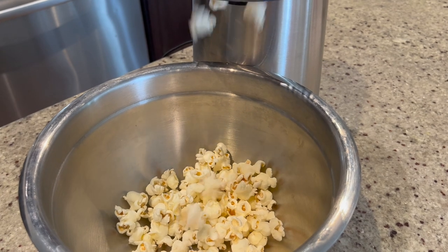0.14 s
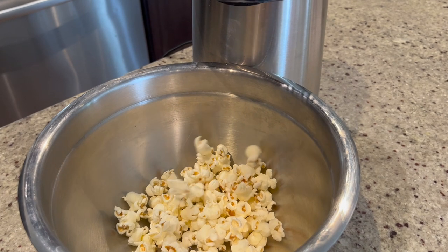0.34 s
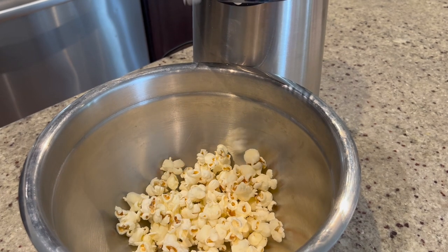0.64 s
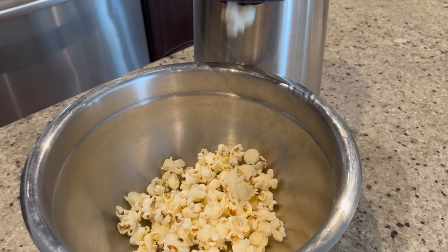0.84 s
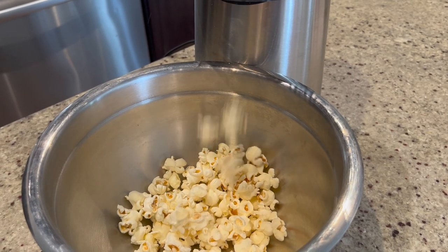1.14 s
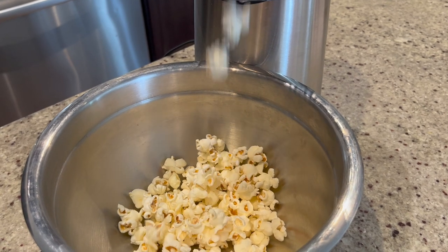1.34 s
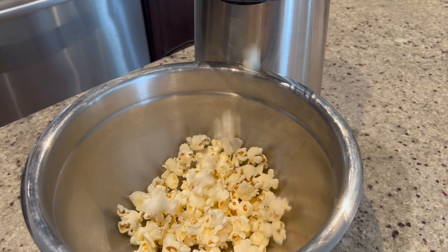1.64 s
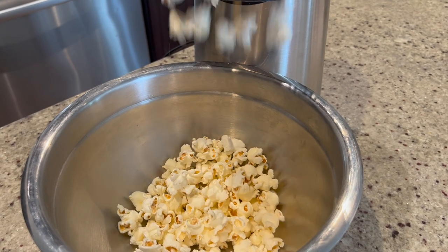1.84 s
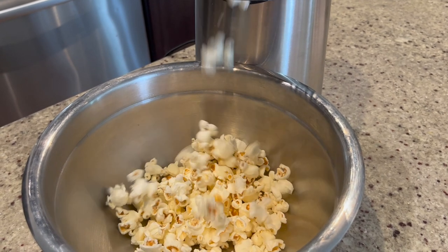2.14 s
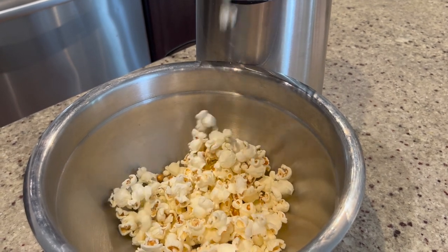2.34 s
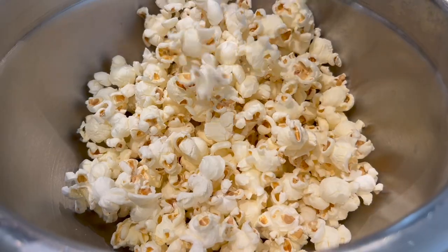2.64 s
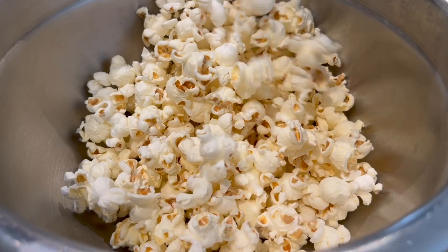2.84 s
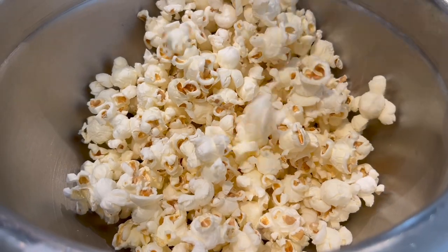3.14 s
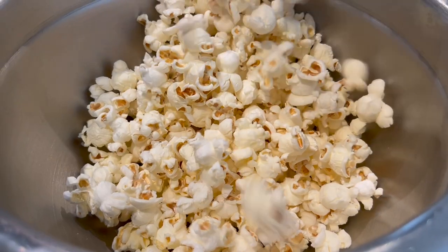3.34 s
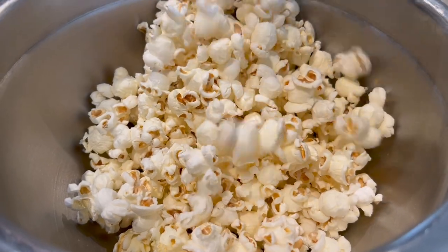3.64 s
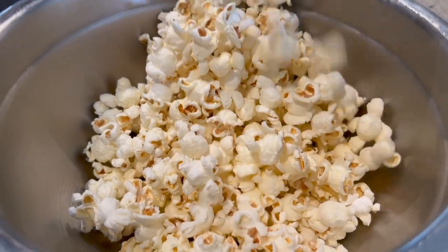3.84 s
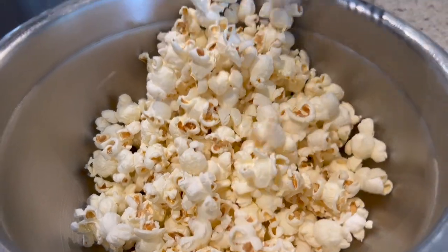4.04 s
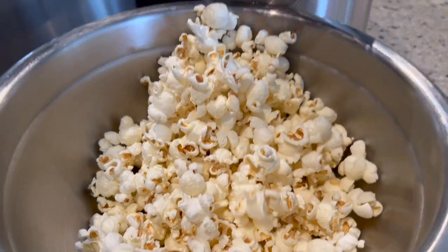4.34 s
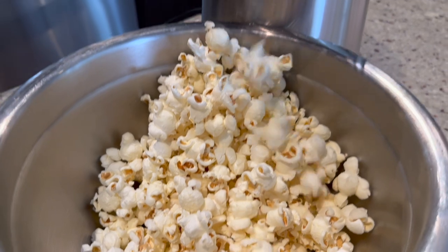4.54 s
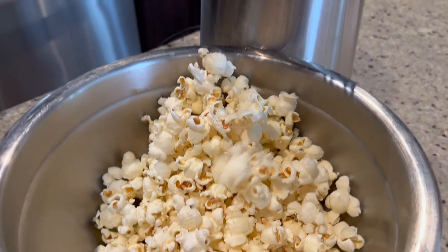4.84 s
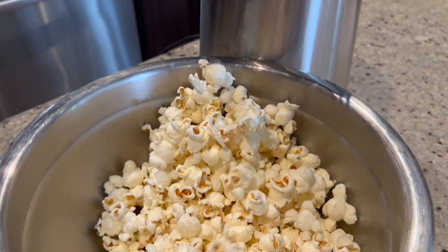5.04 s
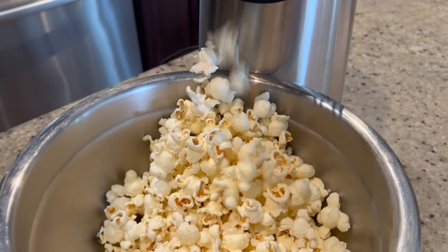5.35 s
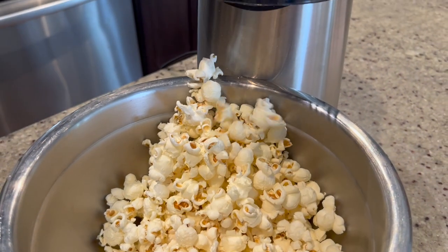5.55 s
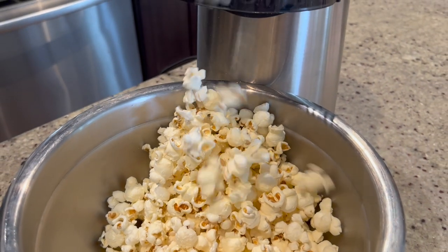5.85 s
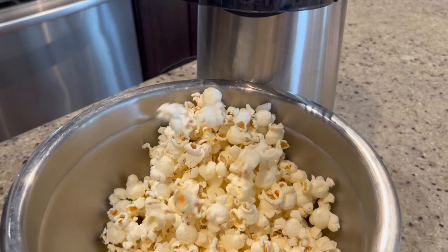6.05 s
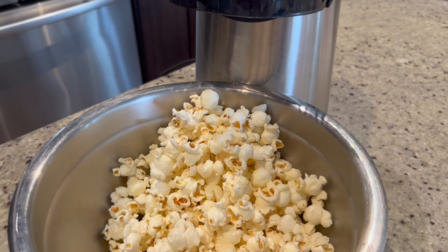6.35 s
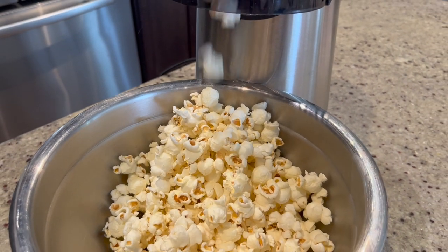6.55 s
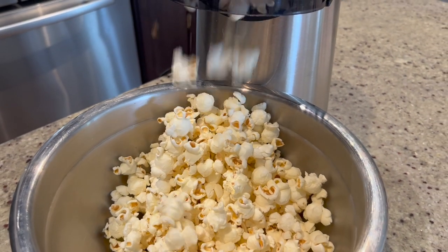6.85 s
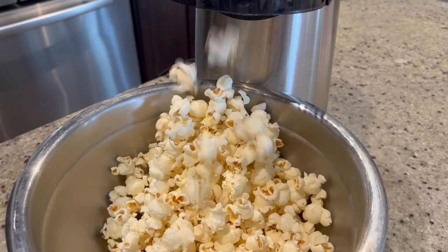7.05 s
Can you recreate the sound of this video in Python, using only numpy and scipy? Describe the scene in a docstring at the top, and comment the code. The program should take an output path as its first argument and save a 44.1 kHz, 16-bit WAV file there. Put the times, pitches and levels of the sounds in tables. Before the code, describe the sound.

A hot-air popcorn machine hums and blows steadily while kernels burst in sharp, irregular pops close by.

```python
"""A hot-air popcorn maker runs on a stone counter in a hard kitchen. From the start the fan motor hums
and whines, and turbulent air roars through the chamber. Kernels burst throughout: each hull tears with
a crack, the pressure step rings the chamber, a low thump follows, and room and metal wall ring on.
The two-port microphone overloads on the loud pops. It takes a dull knock at 2.24 s and stands at a new
place after 2.4 s, where the hum is weaker and the roar has another colour."""
import sys
import numpy as np
from scipy import signal
from scipy.fft import rfft, irfft, next_fast_len
from scipy.io import wavfile

SR = 44100
rng = np.random.default_rng(int(sys.argv[2]) if len(sys.argv) > 2 else 0)


def output_pcm(signal):
    """Save a mono or channel-first signal as 16-bit PCM at the path in sys.argv[1].

    Samples are clipped to [-1, 1] before scaling.
    """
    pcm = np.clip(np.atleast_2d(signal).T, -1, 1) * 32767
    wavfile.write(sys.argv[1], SR, np.round(pcm).astype(np.int16))


N = 316638
MOVE_S = 2.405   # the microphone changes place

# Bursting kernels. Each row: start in seconds, crack level in dB, crack centre in Hz,
# chamber ring level in dB, ring tilt in dB per octave, room level in dB.
BURSTS = [(0.0306, 1, 4350, -11, 13, -16), (0.0662, -6.5, 4430, -15, 14, -27),
          (0.0729, -16, 5000, -18, 3, -32), (0.187, 4, 11100, -1.5, 4, -17.5),
          (0.249, -14, 4050, -17, 7, -30), (0.3152, -9, 12400, -6, -1.5, -25),
          (0.5905, 4, 7100, -7.5, 7, -14), (0.7438, -12.5, 10400, -4, -4.5, -28),
          (1.1761, -5, 11200, -3, 6.5, -25), (1.1809, -8, 4850, -8, 7, -24),
          (1.2506, -6.5, 11300, -23, -2, -30), (1.3351, -9, 4860, -10, 8.5, -23),
          (1.431, -17, 4650, -27, 3, -30), (1.6431, 4, 11200, -8.5, -6.5, -14),
          (1.6809, 1, 10100, -4, 4, -19), (1.692, -17, 4730, -15, -3, -16.5),
          (1.7668, 1, 11000, -7, 6, -18), (1.827, 7, 10300, -8, 13.5, -10.5),
          (1.8374, -4, 10700, -15, -2, -30), (1.8787, -22, 4350, -5, 2, -30),
          (1.952, -1, 10600, 0, -5, -19), (1.9968, 7, 10400, -11, -6, -19),
          (2.1042, -3, 11200, -11, 9, -22), (2.136, -19, 6340, -13, -5, -20), (2.15, 1, 6580, -6, 5, -13),
          (2.2218, 3, 11300, -26, -6, -16.5), (2.264, -2, 11300, -7, 4, -18),
          (2.2777, -15, 6210, -3, -1, -18), (2.3229, -8, 4120, -12.5, 15, -18),
          (2.332, -3, 11400, -20, 10, -24), (2.39, -3, 12100, -3, 7, -22), (2.4678, -0.5, 4320, 3, 1, -16),
          (2.508, 2, 9680, -6, -3, -21), (2.5304, 7, 10100, -12, 0, -14.5), (2.558, -6, 4010, -11, -3, -24),
          (2.606, 3, 4130, -11, 7, -15.5), (2.6568, 8, 11400, -15, -9, -24),
          (2.6646, -6, 5090, -2, -3.5, -14.5), (2.7788, 7, 10700, -19, -4, -16),
          (2.812, 3, 11400, -9, 0, -16), (2.8324, -10, 4360, -19, 6, -33), (2.8973, -8, 11800, 1.5, 1, -30),
          (2.9174, 3, 4270, -10, 0, -16), (2.9454, 3.5, 10000, 2.5, -0.5, -15.5),
          (3.031, 1, 10600, -6, -1, -21), (3.076, 3, 6250, -16, -8, -16), (3.0875, -2, 9900, -6, -2, -25),
          (3.1105, -16, 4650, -16, 6, -30), (3.1606, 3, 14000, -9, 9, -12), (3.171, 2, 6270, 3.5, 0, -25),
          (3.261, 3, 10600, -7, 2, -25), (3.2661, -8, 5150, -12, 0, -24), (3.27, 6, 9600, -15, -9, -22),
          (3.2935, -15, 10100, 0, -1, -20), (3.3502, 0, 10930, 0, -2, -18), (3.357, -5, 11100, 3, -2, -30),
          (3.3887, -7.5, 4400, -2, -3, -25), (3.434, 4, 12200, -10, 0, -15.5),
          (3.4527, -16, 12100, -11, 5, -22), (3.4647, -6, 4010, -6, -1, -28),
          (3.5138, -10.5, 6860, -2, -3.5, -34), (3.709, 1, 11200, -22, -11, -17.5),
          (3.7756, -5, 10100, -9.5, -1, -23), (3.849, 1.5, 6330, -2, -2.5, -21),
          (3.9754, -11, 4000, 3, -1.5, -28), (3.9808, -14, 11200, -3, -2, -31),
          (4.0771, -3, 10000, -11, 1, -23), (4.0814, 2, 10900, -13.5, 9, -23),
          (4.097, -10, 11800, -21, -8, -27), (4.1047, -9, 12000, -22, -1, -23),
          (4.1131, 3.5, 10500, -2, 3, -21), (4.1954, 4, 9700, -2, 0, -14.5),
          (4.2123, -4.5, 5050, -6, 5, -25), (4.2643, -20, 4660, -7.5, -2.5, -28),
          (4.284, 3, 10900, -11, 2, -13), (4.3778, 2.5, 12200, 1, -2, -14),
          (4.4001, -4, 4680, -1, 0.5, -16), (4.491, -6, 11600, 2, -1, -26),
          (4.777, -14.5, 12000, -3, 4.5, -34), (5, -2, 10400, -12, 4, -21.5),
          (5.0116, -15, 4150, -11, 3, -33), (5.074, -1.5, 4600, -4, 2.5, -15),
          (5.202, -2, 10400, -11, 9, -12), (5.22, -2, 12100, -11, 8.5, -19),
          (5.2549, -1.5, 5260, -8, 3, -17.5), (5.3873, 3, 4420, -12.5, 9.5, -11.5),
          (5.442, -5, 6540, -5.5, 2.5, -15), (5.453, -1, 7400, -13, 13, -18),
          (5.481, -2.5, 5600, -5, 4, -21), (5.5847, -7, 6240, -2, 1, -22), (5.602, 1, 11500, -16, 4, -20),
          (5.6128, -5, 4680, -9, 8, -17), (5.9263, -4.5, 12400, -1.5, 2.5, -23),
          (6.0173, -11, 12000, -8.5, 7, -24), (6.0508, 4, 10700, -17, 6, -14.5),
          (6.1683, 1, 6960, -12, 5, -13.5), (6.2989, -1.5, 9900, -5.5, 6, -18),
          (6.3753, 4, 9700, -22, 12, -15), (6.423, 1, 4570, -4, 7.5, -16.5),
          (6.5575, -2, 4620, -10.5, 12, -16.5), (6.5972, -1.5, 9680, 1.5, -0.5, -19),
          (6.6332, -3.5, 4680, -3, -1, -20), (6.6437, 0, 6000, -10, 8, -18),
          (6.6945, -6.5, 6180, -10.5, 8, -19), (6.6993, -6, 4520, -13, 4.5, -23),
          (6.7595, 1, 12200, -22, 0, -16.5), (6.872, 0, 4630, -9.5, 7, -16.5),
          (7.0017, 1, 10900, -20, -6, -16.5), (7.0882, 1, 4190, -11, 2, -15.5),
          (7.164, 1.5, 11700, -12, 4, -11)]
# The fan as heard. Each row: time in seconds, then the levels of whine, roar and hiss in dB.
FAN_LEVELS = [(0, -24.5, -15.5, -29.5), (1.2, -25.5, -17.5, -32), (2.39, -26, -16, -28),
              (2.42, -32, -17, -29.5), (3.0, -38, -16.5, -31), (3.5, -32.5, -17, -33),
              (4.6, -24.5, -17.5, -37.5), (5.8, -26, -17.5, -36.5), (7.18, -25.5, -18, -35.5)]


def hull_cracks():
    """Fracture: a hull tears in a few ms of bright noise, which the room answers; two noise draws."""
    t = np.arange(900) / SR
    direct, room_energy = np.zeros((2, N)), np.zeros(N)
    for start, crack_db, hz, ring_db, _, room_db in BURSTS:
        white = rng.standard_normal((2, len(t)))
        tear_ms = max(5.2 + .29 * ring_db + .51 * rng.standard_normal(), 2)   # deeper bursts tear longer
        envelope = np.minimum(t / .00048, 1) * np.exp(-(1000 * t / tear_ms) ** 2)
        crack = resonance(white, hz, width=14000) + .5 * resonance(white, hz, width=1100)
        add(direct, start, from_db(crack_db) * rms_one(crack) * envelope)
        add(room_energy, start, from_db([room_db]) ** 2)
    return direct + reverberation(room_energy)


def chamber_ring():
    """Free vibration: each pressure step rings the chamber's modes, each with a strength of its own."""
    # Each row: mode frequency in Hz, width of one filter stage in Hz, relative level in dB.
    modes = [(243, 178, -4), (423, 113, -7.5), (548, 258, 5), (859, 534, 3.5), (1403, 350, -4),
             (1800, 67, -24)]
    _, _, _, ring_db, tilt_db, _ = np.transpose(BURSTS)
    polarity = rng.choice([-1, 1], len(BURSTS))
    click, ring = signal.unit_impulse(3000), np.zeros(N)
    for hz, width, mode_db in modes:
        level_db = ring_db + mode_db + tilt_db * np.log2(hz / 600) + rng.normal(0, .54, len(BURSTS))
        response = resonance(resonance(click, hz, width), hz, width)
        ring += at_each_burst(polarity * from_db(level_db), response, lag_s=.000937)
    return ring


def low_thumps():
    """Impulse response of a low band: a thump ends each burst, growing with its ring; left and right."""
    start, _, _, ring_db, _, _ = np.transpose(BURSTS)
    polarity, level_chance, balance_chance = rng.standard_normal((3, len(BURSTS)))
    response = butterworth(signal.unit_impulse(3000), 3, [66, 200], "band")
    level_db = np.where(start > MOVE_S, -13.5, -10.5) + .44 * ring_db + 1.5 * level_chance
    sides = panned(np.sign(polarity) * from_db(level_db), balance_db=2 * balance_chance)
    return np.array([at_each_burst(side, response, lag_s=.00532) for side in sides])


def reverberation(energy):
    """Diffuse field: reflections build up and decay, the treble sooner, the wall modes later."""
    # Colour of the room's answer. Each row: frequency in Hz, relative spectral level in dB.
    room_spectrum = [(100, 7.5), (1500, 10.5), (2600, -2.5), (4500, 7.5), (7000, 5.5), (11000, 7.5),
                     (16000, -8)]
    # Modes of the metal chamber wall. Each row: frequency in Hz, width in Hz, gain in dB.
    wall_modes = [(4490, 25, 0.5), (4600, 37, -10), (5600, 50, -13)]
    t, build_s = np.arange(SR) / SR, .00067
    noise = rms_one(coloured(rng.standard_normal((2, N)), room_spectrum))
    treble = butterworth(noise, 2, 7000, "high")
    wall = sum(from_db(db) * resonance(noise, hz, width) for hz, width, db in wall_modes)
    field = np.zeros((2, N))
    for part, t60_s in ((noise - treble, .32), (treble, .2), (wall, 1)):
        envelope = (1 - np.exp(-t / build_s)) * from_db(-60 * t / t60_s)
        stored_energy = signal.fftconvolve(energy, envelope ** 2)[:N]   # incoherent tails add in energy
        field += part * np.sqrt(np.abs(stored_energy))
    return field * from_db(1.2 * drift(90))


def rushing_air():
    """Forced resonance: turbulence drives the chamber's modes over a broad hiss; two noise draws."""
    # Each row: frequency in Hz, nominal width in Hz, relative level in dB before and after the move.
    air_modes = [(435, 312, -5.5, -3), (587, 111, 1, 2), (893, 164, -2.5, -5), (1217, 252, -0.5, -2.5),
                 (1673, 168, 0, -4.5), (1843, 236, -2, -8.5), (2310, 150, -32, -46), (2923, 112, -5.5, -12),
                 (3040, 285, -13, -18), (3850, 270, -19.5, -22.5), (4700, 200, -25, -28),
                 (5530, 60, -36, -49)]
    # Each row: frequency in Hz, relative spectral level in dB.
    hiss_spectrum = [(30, -10), (60, -5), (110, 12.5), (250, 17), (2000, -3), (2600, -2), (3700, 5),
                     (5300, -1.5), (8000, -7), (12000, -6), (16000, -25)]
    _, roar_db, hiss_db = time_curves(FAN_LEVELS)
    white, roar = rng.standard_normal((3, 2, N)), np.zeros((2, N))
    moved = np.arange(N) / SR > MOVE_S
    for k, (hz, width, before_db, after_db) in enumerate(air_modes):
        band = resonance(resonance(white[k % 2], hz, 1.29 * width), hz, 1.29 * width)
        roar += from_db(np.where(moved, after_db, before_db) + .7 * drift(10)) * band
    hiss = coloured(white[2], hiss_spectrum)
    hiss /= np.std(butterworth(hiss, 4, 3000, "high"))   # the hiss level refers to the treble
    return from_db(roar_db) * rms_one(roar) + from_db(hiss_db + drift(33)) * hiss


def motor_hum():
    """Periodic excitation: the motor sounds wavering orders of its shaft speed; left and right."""
    # Each row: time in seconds, shaft speed in turns per second.
    shaft_speed = [(0, 287.0), (2.4, 287.1), (4.6, 287.5), (7.18, 287.9)]
    # The fundamental. Each row: time in seconds, level in dB, left minus right in dB.
    hum_levels = [(0, -12.5, -6.5), (2.39, -13, -6.2), (2.42, -17, -9.5), (3.8, -17.5, -10), (4.6, -18, -9),
                  (7.18, -18.5, -9)]
    # Each row: multiple of shaft speed, level in dB relative to the fundamental, left minus right in dB.
    overtones = [(1.5, -21.5, 10.5), (2, -19, 6), (3, -15.5, -13), (4, -17, -4), (7, -27, -4),
                 (8, -26.5, 1), (9, -49, -1), (14, -48, 9)]
    (shaft_hz,) = time_curves(shaft_speed)
    hum_db, hum_balance_db = time_curves(hum_levels)
    angle = 2 * np.pi * np.cumsum(shaft_hz + .15 * drift(3)) / SR
    lead_rad = np.array([[0], [.46]])   # the right side leads
    waver = from_db(.5 * drift(12) + .5 * drift(27))
    hum = panned(waver * np.sin(angle + lead_rad), hum_balance_db)
    for order, db, balance_db in overtones:
        hum += panned(from_db(db + 1.3 * drift(2.7)) * np.sin(order * angle + order), balance_db)
    return np.sqrt(2) * from_db(hum_db) * hum


def motor_whine():
    """Slight amplitude and phase modulation makes two steady tones waver; left and right."""
    # Each row: frequency in Hz, relative level in dB, left minus right in dB.
    partials = [(905, 0, 4), (1809, -10, 0)]
    whine_db, _, _ = time_curves(FAN_LEVELS)
    t, whine = np.arange(N) / SR, np.zeros((2, N))
    for hz, db, balance_db in partials:
        tone = np.sin(2 * np.pi * hz * t + .4 * drift(2))
        whine += panned(from_db(db + 1.5 * drift(4)) * tone, balance_db)
    return np.sqrt(2) * from_db(whine_db) * whine


def microphone_knock(centre_s=2.243, level_db=-11, hz=55):
    """Structure-borne sound: one dull knock passes through the microphone body."""
    t = np.arange(N) / SR - centre_s
    return from_db(level_db) * np.sin(2 * np.pi * hz * t) * np.exp(-(t / .011) ** 2)


def microphone_ports(draws):
    """Partial coherence: the ports get the first draw alike and the second with opposite signs."""
    # Each row: frequency in Hz, right's lead in radians, likeness from 0 to 1, left minus right in dB.
    port_response = [(20, 0, .92, 0), (220, 0, .94, -1), (600, -.2, .88, 2), (1250, 0, .85, 1.5),
                     (1450, -1.6, .4, -2), (1750, -.15, .95, 0), (2500, -.4, .6, 2), (3500, -1.8, .4, 1),
                     (4000, -.6, .35, 4), (5000, 0, .45, 3), (7000, 1.9, .7, 1), (8500, 3.14, .95, 0),
                     (12000, 6.28, .93, 0), (16000, 9.8, .8, 0)]
    size = next_fast_len(N + 2000)
    hz, *columns = np.transpose(port_response)
    lead, likeness, balance_db = [np.interp(np.fft.rfftfreq(size, 1 / SR), hz, c) for c in columns]
    common, opposed = rfft(draws, size) * np.sqrt([(1 + likeness) / 2, (1 - likeness) / 2])
    left = (common + opposed) * from_db(balance_db / 2)
    right = (common - opposed) * from_db(-balance_db / 2) * np.exp(1j * lead)
    return irfft(np.array([left, right]), size)[:, :N]


def at_each_burst(strengths, response, lag_s):
    """Convolution: one impulse per burst excites a response scaled to peak 1."""
    clicks = np.zeros(N)
    clicks[[round((row[0] + lag_s) * SR) for row in BURSTS]] = strengths
    return signal.fftconvolve(clicks, response / np.abs(response).max())[:N]


def resonance(x, hz, width):
    """A damped two-pole resonator with peak gain 1 and a width in Hz."""
    r = np.exp(-np.pi * width / SR)
    feedback = [1, -2 * r * np.cos(2 * np.pi * hz / SR), r * r]
    return signal.lfilter(np.array([1, 0, -1]) * (1 - r * r) / 2, feedback, x)


def butterworth(x, order, hz, kind):
    """A filter with a maximally flat passband."""
    return signal.sosfilt(signal.butter(order, hz, kind, fs=SR, output="sos"), x)


def coloured(x, spectrum):
    """Spectral shaping by levels joined on a log-frequency axis."""
    hz, level_db = np.transpose(spectrum)
    bins = np.fft.rfftfreq(x.shape[-1], 1 / SR) + 1
    gain = from_db(np.interp(np.log(bins), np.log(hz), level_db))
    return irfft(rfft(x) * gain, x.shape[-1])


def drift(corner_hz):
    """Random fluctuation: low-passed noise of rms 1, drawn at every 40th sample."""
    r = np.exp(-2 * np.pi * corner_hz * 40 / SR)
    slow = signal.lfilter([1], [1, -2 * r, r * r], rng.standard_normal(N // 40 + 2002))[2000:]
    return np.interp(np.arange(N) / 40, np.arange(len(slow)), rms_one(slow))


def time_curves(rows):
    """Linear interpolation of each later column over the times in the first."""
    times, *columns = np.transpose(rows)
    return [np.interp(np.arange(N) / SR, times, c) for c in columns]


def panned(x, balance_db):
    """Level difference: left exceeds right by balance_db."""
    half = from_db(np.reshape(balance_db, (1, -1)) / 2)
    return x * np.concatenate([half, 1 / half])


def add(track, start_s, piece):
    """Superposes a piece on the track."""
    i = round(start_s * SR)
    track[..., i:i + piece.shape[-1]] += piece[..., :N - i]


def from_db(db):
    """Decibels to amplitude ratio."""
    return 10 ** (np.asarray(db) / 20)


def rms_one(x):
    """Normalises to rms 1."""
    return x / np.sqrt(np.mean(x ** 2) + 1e-20)


def scene():
    """Superposition: pops and air pass the two ports; motor and lows keep a balance of their own."""
    ring = chamber_ring() * [[1], [.3]]   # mostly common to both ports
    airborne = hull_cracks() + ring + rushing_air()
    return microphone_ports(airborne) + low_thumps() + motor_hum() + motor_whine() + microphone_knock()


def record(dry):
    """Overload: the input clips hard near full scale, then a steep low-pass cuts the top."""
    clipped = np.clip(dry, -.98, .98)
    cutoff_hz = 15830
    return signal.sosfilt(signal.ellip(10, .3, 80, cutoff_hz, fs=SR, output="sos"), clipped)


dry = scene()
out = record(dry)
output_pcm(out)
```